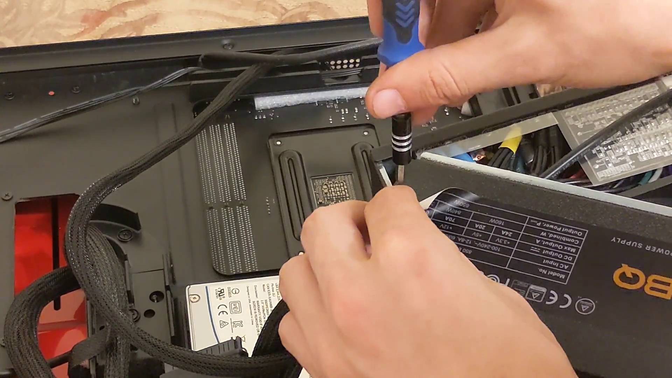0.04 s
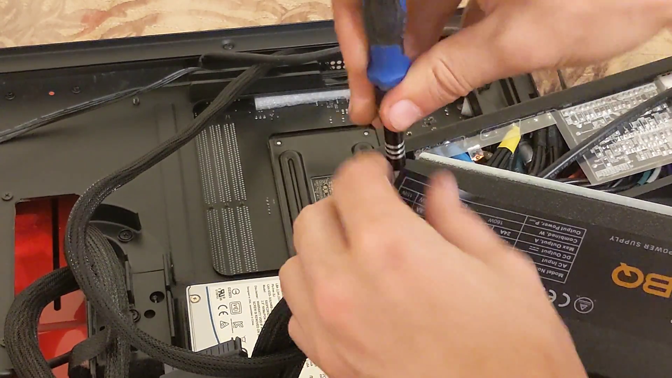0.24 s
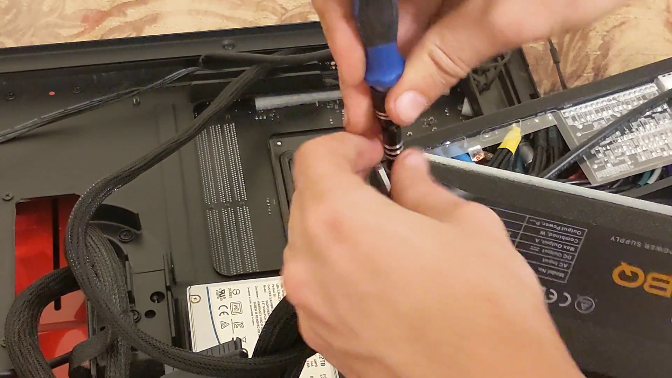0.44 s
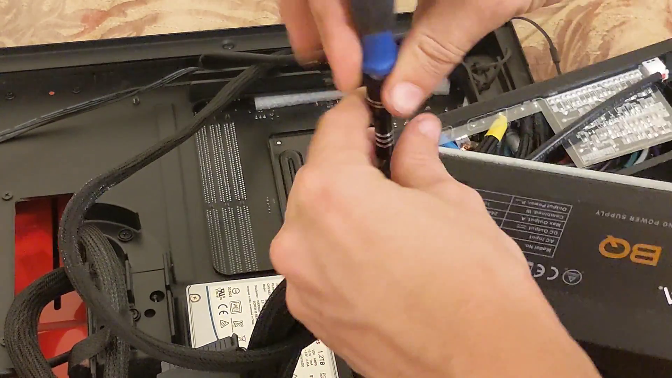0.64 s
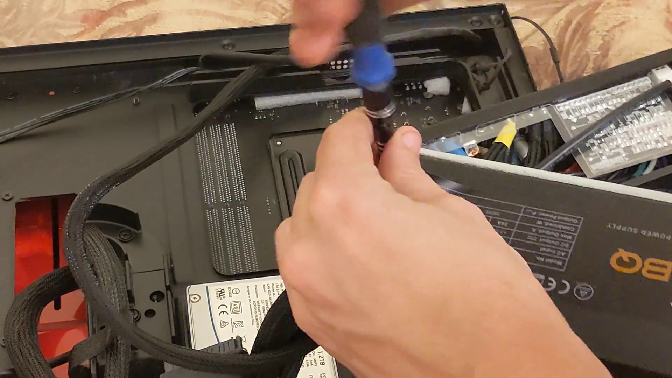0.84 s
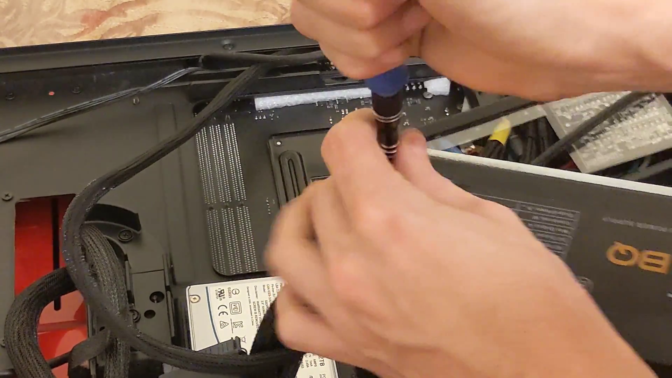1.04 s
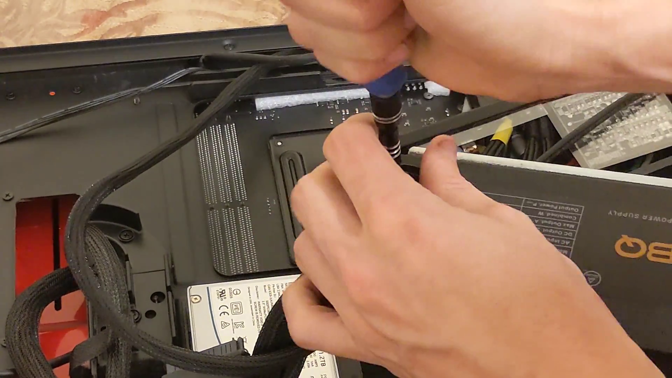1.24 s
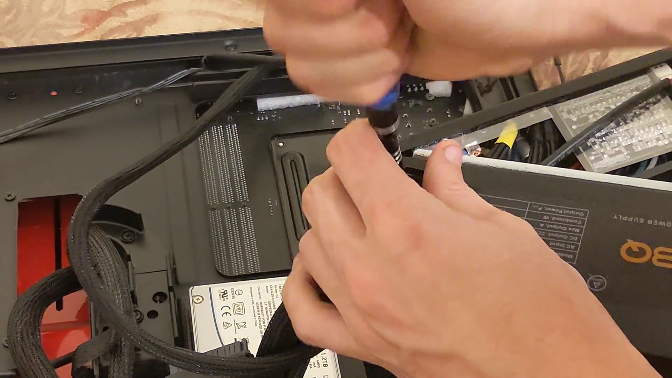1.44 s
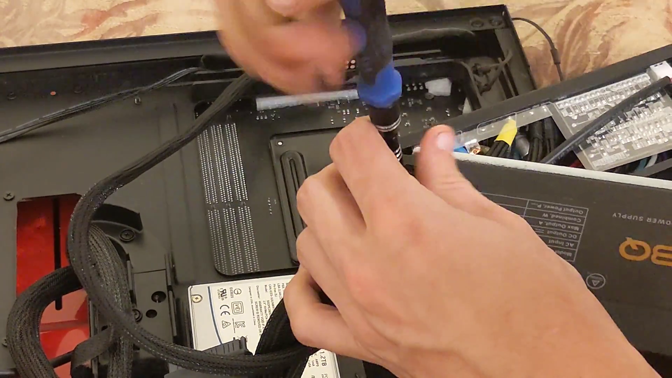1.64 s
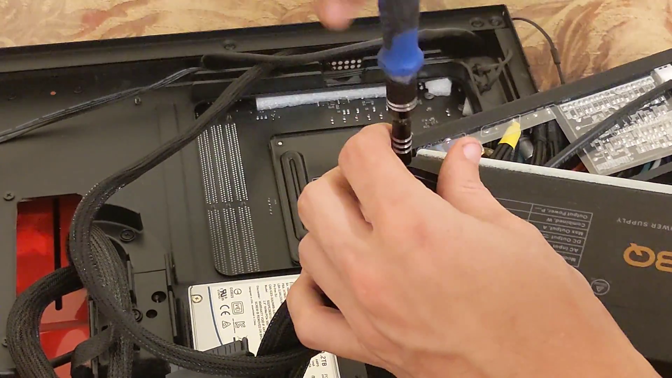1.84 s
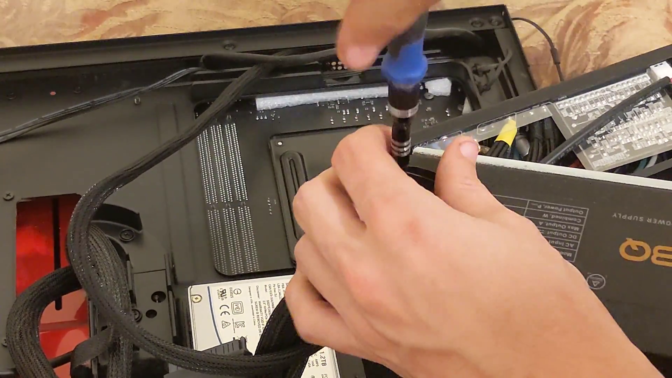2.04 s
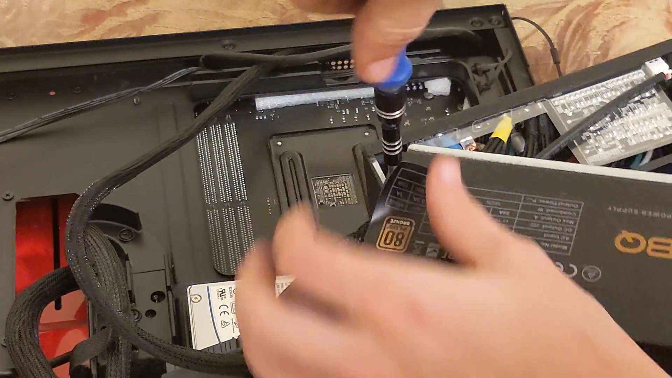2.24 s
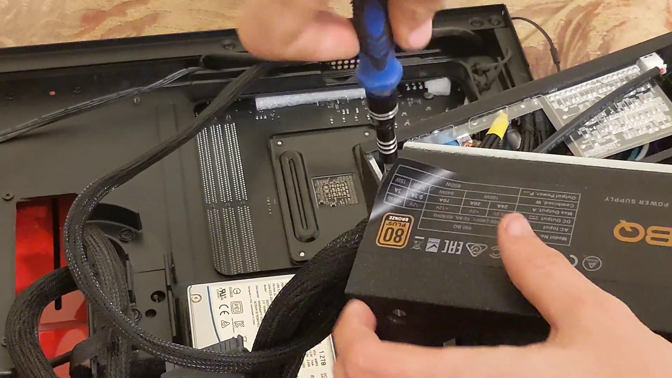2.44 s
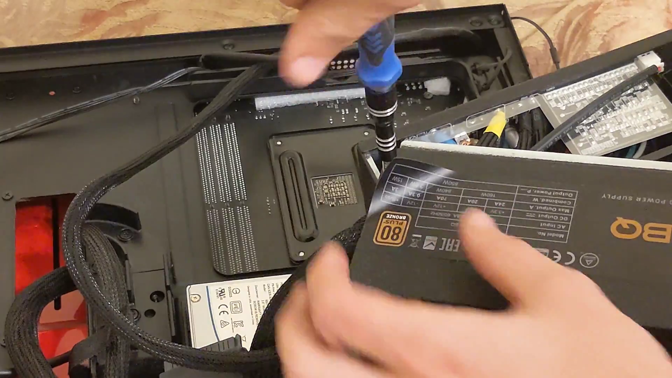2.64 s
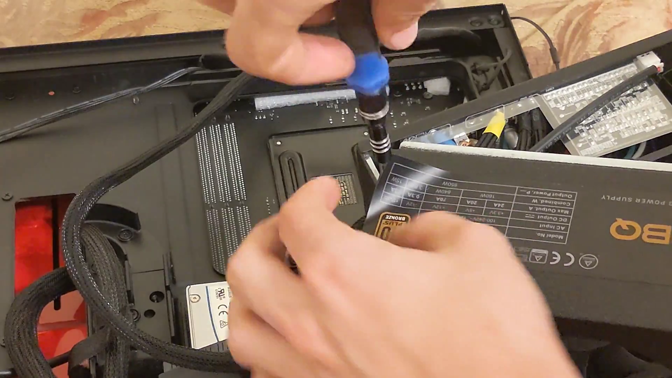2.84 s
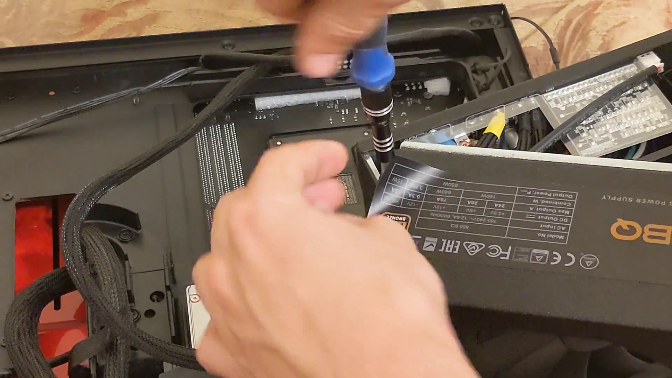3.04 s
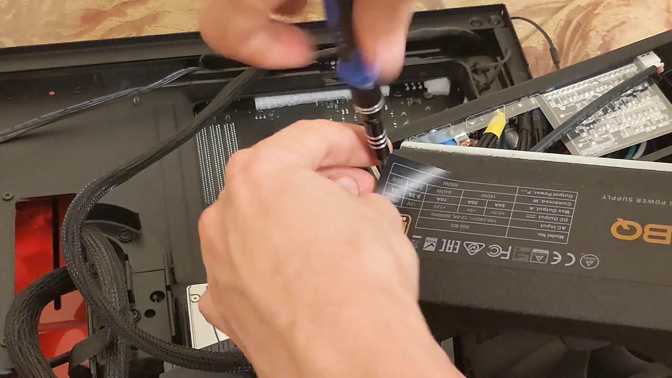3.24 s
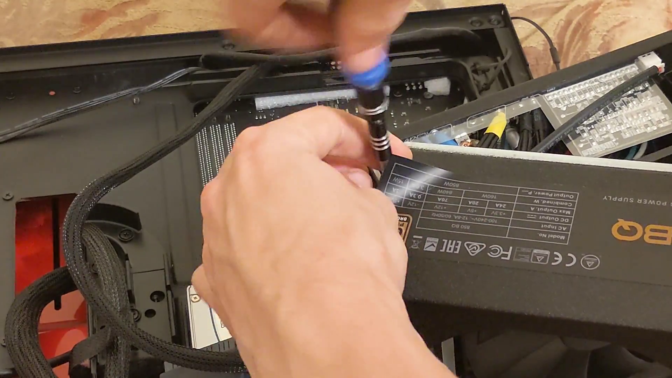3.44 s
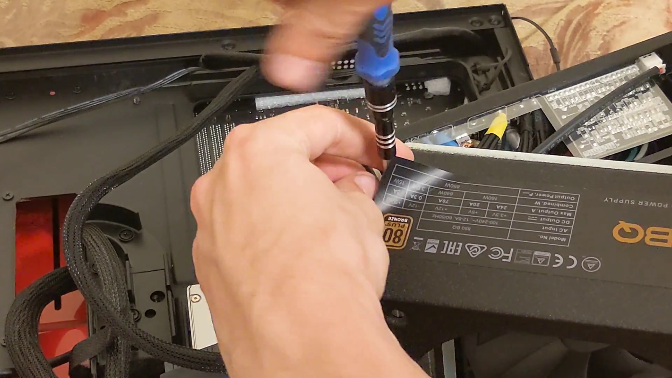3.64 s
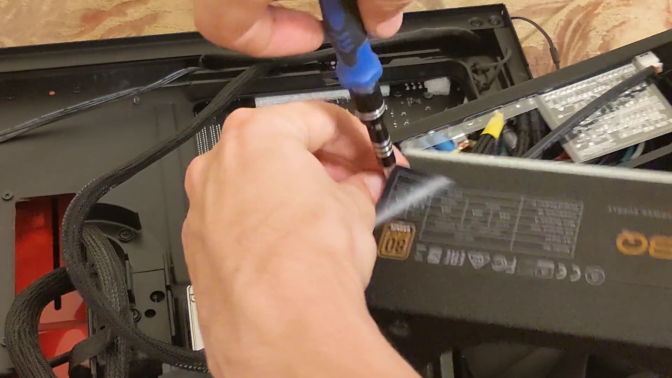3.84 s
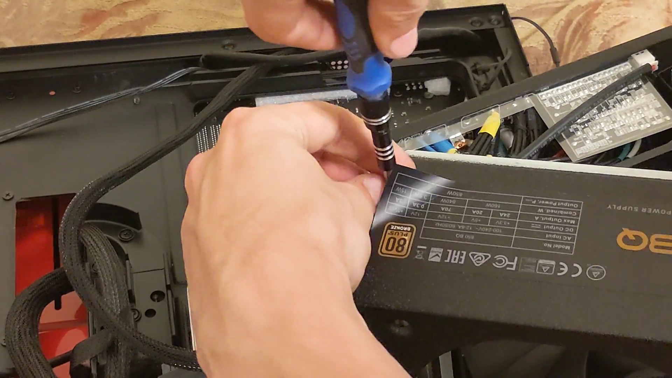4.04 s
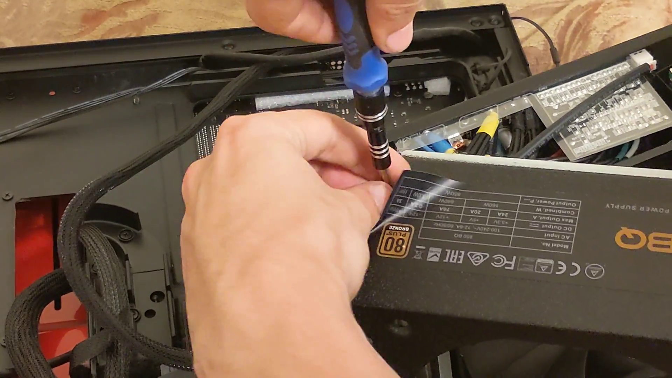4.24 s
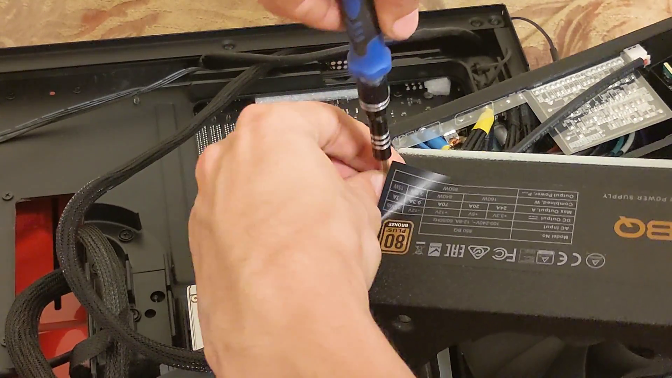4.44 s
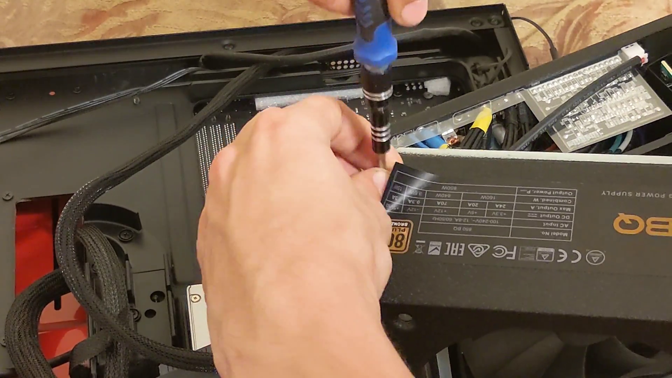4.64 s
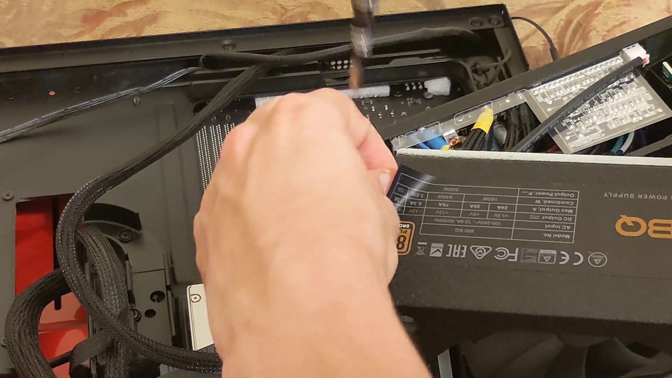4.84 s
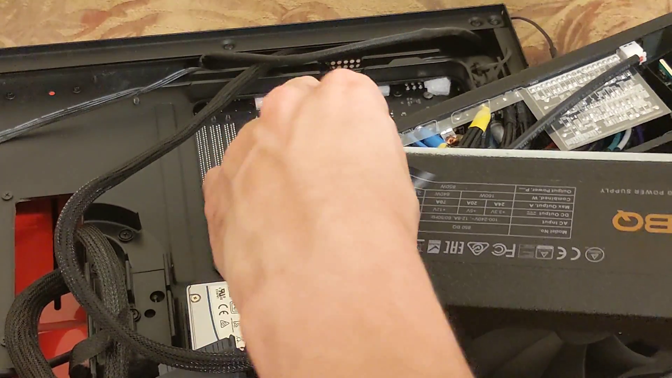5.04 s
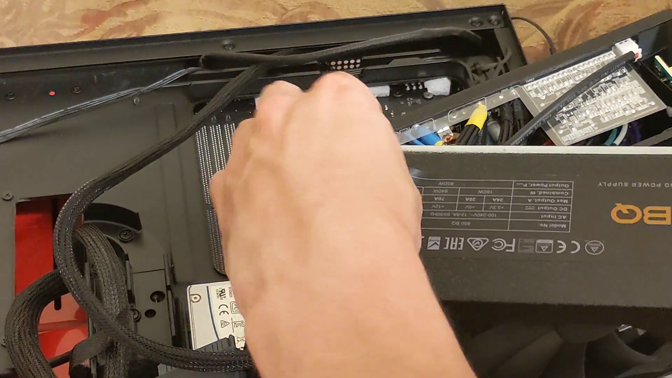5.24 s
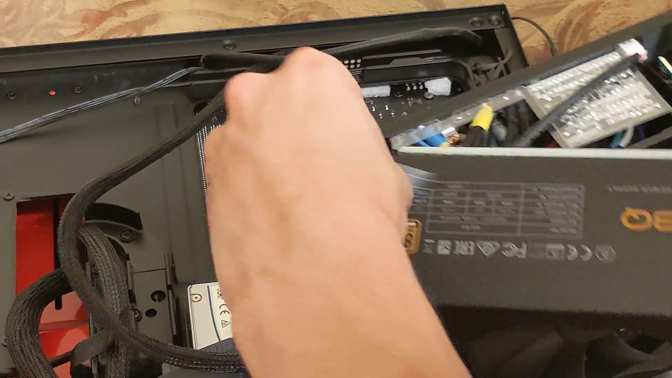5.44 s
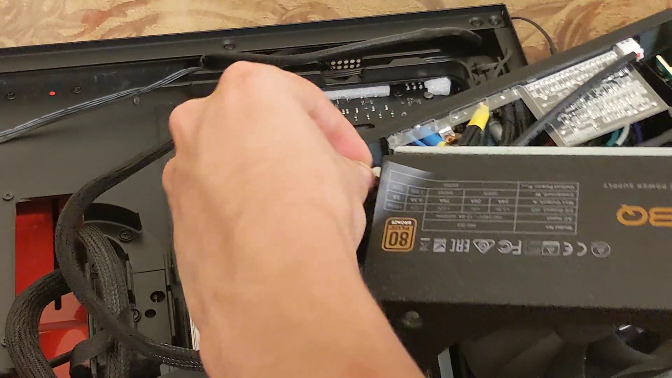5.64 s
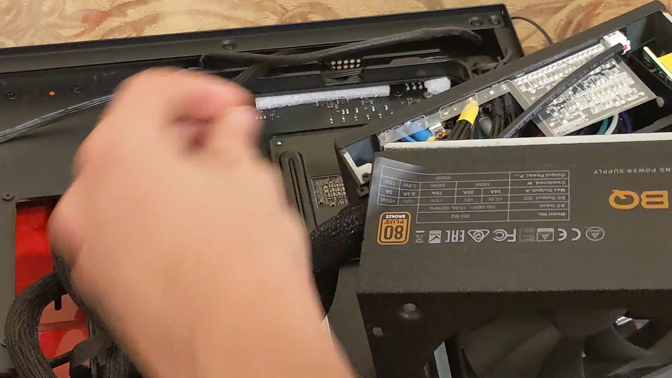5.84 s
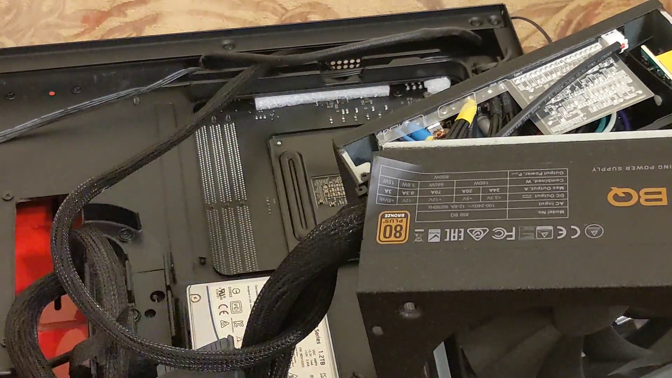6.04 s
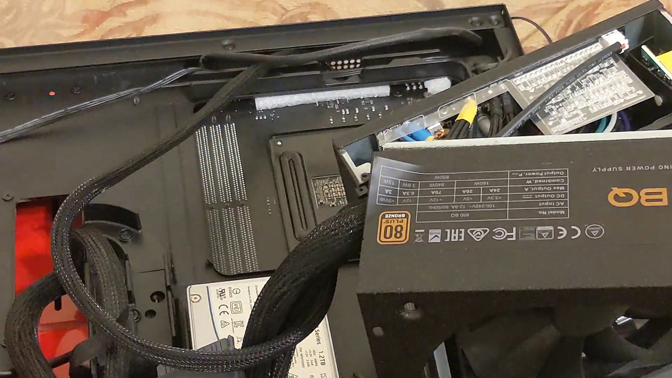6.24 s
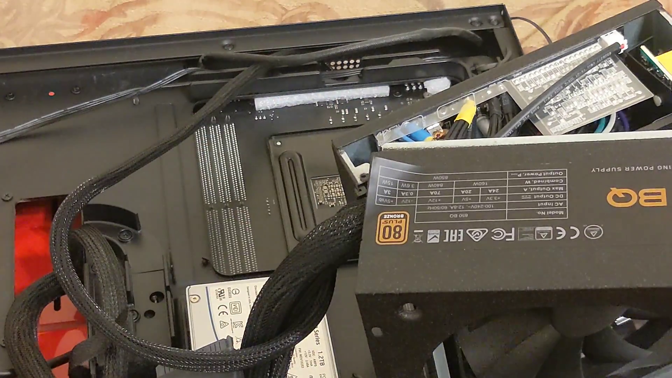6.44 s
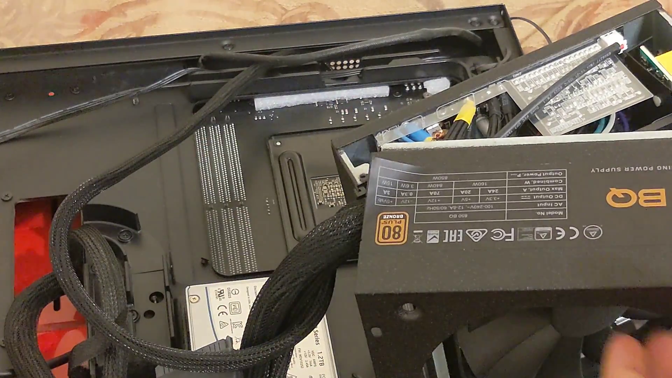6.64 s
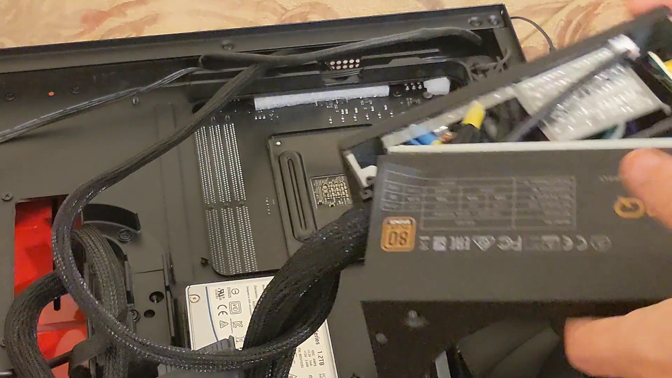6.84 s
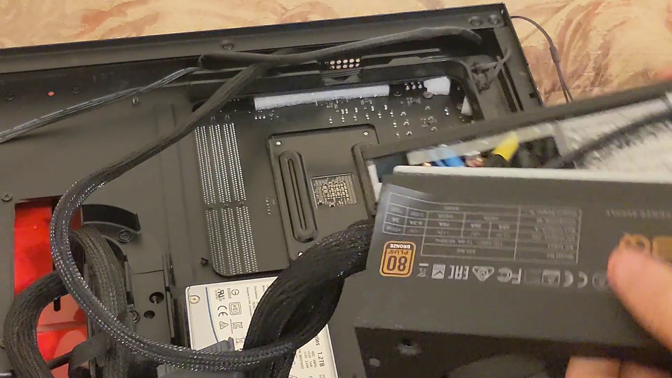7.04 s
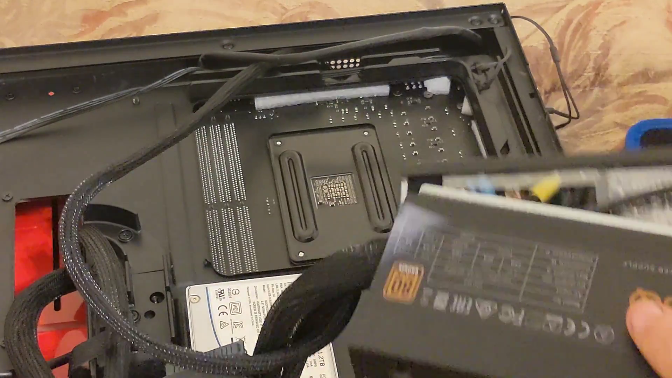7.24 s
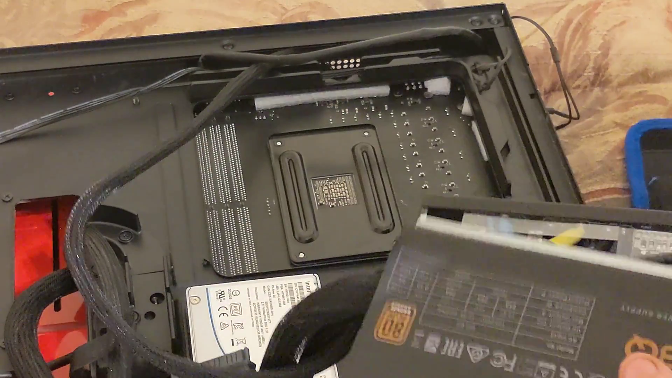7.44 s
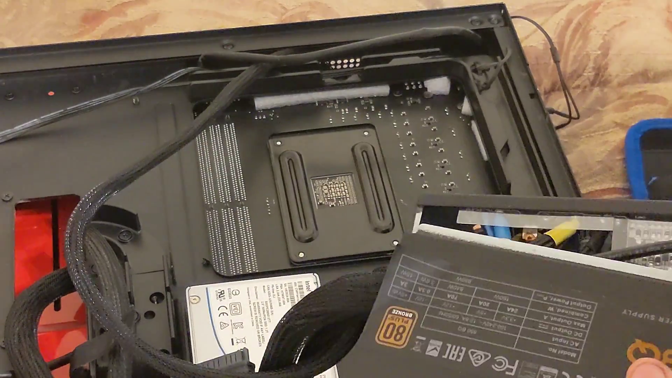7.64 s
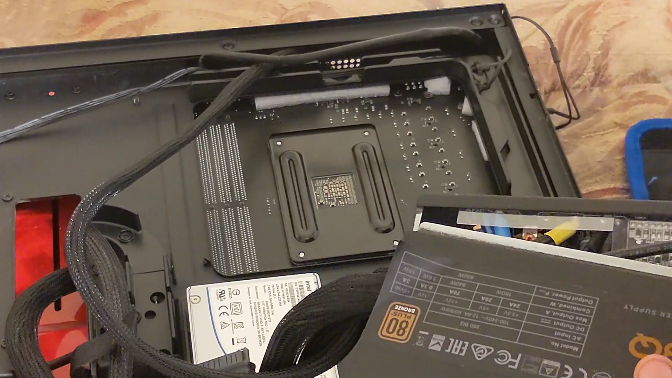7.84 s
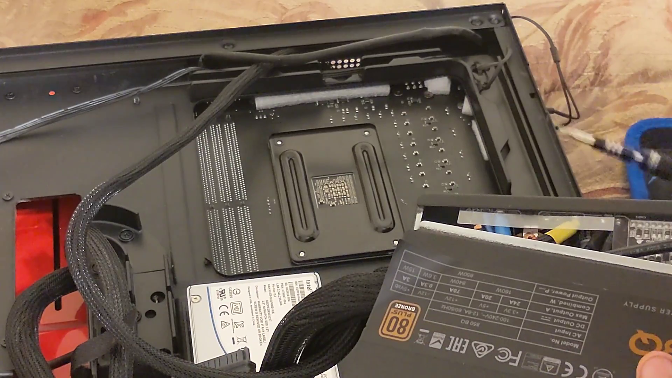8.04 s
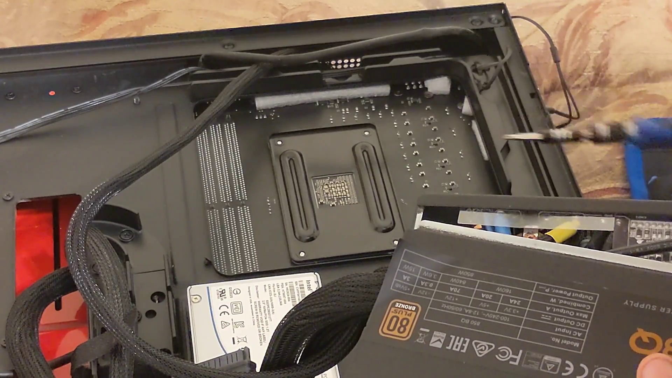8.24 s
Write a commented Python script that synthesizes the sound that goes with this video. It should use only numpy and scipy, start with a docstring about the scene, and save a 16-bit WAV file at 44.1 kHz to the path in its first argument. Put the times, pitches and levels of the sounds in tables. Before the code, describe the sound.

Light metallic ticks and dull sheet-metal taps as a small screw is backed out, then a metal box scrapes aside with loose rattling knocks.

```python
"""Screw backed out of a sheet-metal box

A small screw is backed out of a sheet-metal box that lies on an open computer case, in a quiet room.
Noise bursts for the blows drive dull panel filters and dying modes; the steel bit ticks and skids brightly.
Gritty noise makes the rub of fingers and cables; filtered noise creaks, and short sines pop.
At the end the box is dragged aside and set down, with a loose lid rattling and the bench thudding.
"""
import sys
import numpy as np
from scipy import signal
from scipy.fft import rfft, irfft
from scipy.io import wavfile
from scipy.ndimage import uniform_filter1d

SR = 44100
rng = np.random.default_rng(int(sys.argv[2]) if len(sys.argv) > 2 else 0)


def unload_wav(signal):
    """Save mono or channel-first audio to the path in sys.argv[1] as 16-bit WAV at rate SR, clipped to [-1, 1]."""
    wavfile.write(
        sys.argv[1],
        SR,
        np.round(np.clip(np.atleast_2d(signal).T, -1, 1) * 32767).astype(np.int16),
    )


N = 366206  # samples

# Room tone and hiss, relative spectrum: freq_hz, level_db (per Hz)
AIR = [(25, -15), (84, -9), (108, -2.5), (167, -5), (208, -8.5), (313, -13), (524, -16.5), (787, -22),
       (4360, -25.5), (10700, -34), (15200, -29), (16500, -44)]
AIR_DB = -66
# Likeness of left and right in room tone and echoes: freq_hz, likeness (0 to 1)
LIKENESS = [(25, 0.83), (110, 0.49), (250, 0.79), (1000, 0.19), (4000, 0.067), (8000, 0.77), (14000, 0.71)]
# Decay of the room echoes: freq_hz, t60_s
ROOM_DECAY = [(150, 0.52), (400, 0.3), (1000, 0.28), (3000, 0.33), (8000, 0.28), (15000, 0.16)]

# Short dry pops with no echo, close to the microphone: start_s, level_db, pitch_hz, pan_db (left over right)
POPS = [(2.023, -43.5, 780, -10), (5.05, -47, 1660, -2), (6.178, -51.5, 800, -9)]

# Short pitched creaks: start_s, length_s, level_db (before the fades), pitch_hz
CREAKS = [(0.083, 0.053, -46.5, 560), (1.459, 0.17, -71, 774), (1.49, 0.12, -72, 3340),
          (2.078, 0.043, -71, 3200), (2.287, 0.046, -68, 3120), (3.932, 0.069, -54.5, 910),
          (4.496, 0.086, -60, 692), (5.444, 0.035, -58.5, 1790), (5.671, 0.022, -47.5, 694),
          (7.017, 0.022, -32, 666), (7.037, 0.02, -39.5, 5900), (7.201, 0.029, -37, 2590),
          (7.329, 0.11, -40.5, 2610), (7.826, 0.092, -52.5, 700)]
CREAK_Q = 10.3  # sharpness of the creaking panel, in each of two passes

# Twists and shifts of the hands: peak_s, drag_db (on the box), rustle_db (skin and thread)
STROKES = [(0, -64, -58.5), (.98, -73, -65), (1.91, -69.5, -70), (2.22, -74.5, -76), (2.487, -67.5, -65),
           (2.919, -64, -67), (3.25, -72.5, -83), (3.588, -65, -70.5), (3.964, -51.5, -56.5),
           (5.43, -70, -64), (5.69, -55.5, -75), (5.77, -98, -63), (5.958, -66, -60), (6.306, -67.5, -76),
           (7.948, -52, -88), (8.1, -71, -86)]
SWELL_DB_PER_S, EASE_DB_PER_S = 174, 159  # a stroke builds up, then lets go
# Faint rub as long as the hands are on the work
GRIP_DRAG_DB, GRIP_RUSTLE_DB, LET_GO_S = -79, -81, 6.05
# The box is dragged aside: time_s, drag_db, rustle_db, shudder_db (of the bench)
HAUL = [(6.78, -95, -75, -100), (6.92, -69, -71, -76), (7.03, -40.5, -47.5, -44), (7.14, -48.5, -52, -51),
        (7.31, -47.5, -56.5, -51), (7.42, -39, -44, -50.5), (7.53, -52.5, -52.5, -54.5),
        (7.72, -61.5, -77.5, -63), (7.949, -80, -74, -58.5), (8.3, -81, -87.5, -69)]

# Steel bit and screw touching metal: start_s, sizzle_db, clink_db, pan_db (left over right)
TICKS = [(0.1062, -34, -26, 4), (0.239, -46, -45, 1), (0.3441, -46, -46, -2), (0.407, -53, -56, 6),
         (0.6464, -57, -44.5, 8), (0.844, -44, -47, 3), (0.974, -42, -35, 6), (1.747, -55, -64, 5),
         (1.8851, -46, -44.5, 8), (2.177, -46, -58, 3), (2.616, -42.5, -43, 3), (2.793, -48, -49.5, 2.0),
         (2.918, -37.5, -73, 5), (2.9874, -42, -62, 0), (3.1762, -46, -45, 0), (3.248, -44.5, -50, 1),
         (3.5019, -57, -58, 3.5), (3.588, -44, -66, 1), (3.642, -54, -48.5, 3), (3.951, -34, -56, 0),
         (4.0692, -40, -51, 5.5), (4.288, -60, -56.5, 8), (4.574, -42, -57, 0), (5.047, -55, -59, -3),
         (5.232, -60, -55, 0), (5.2759, -49, -54, 1), (5.6008, -53, -38, 6), (5.618, -40, -38, 3),
         (5.661, -45, -38.5, 7), (5.694, -31, -56, 2), (5.703, -45, -44, 0), (5.7663, -29, -53, -1),
         (5.8566, -9, -47, 3.5), (7.0362, -12.5, -18.5, 4), (7.337, -42, -29.5, 4), (7.372, -24.5, -35, 1),
         (7.434, -29, -21.5, -1.5), (7.5586, -48, -16.5, 12), (7.926, -28.5, -30, 4), (8.104, -50, -57, 7)]
# The bit skids in the screw head: start_s, sizzle_db, clink_db, contact_ms (decay time)
SKIDS = [(1.1888, -50, -40, 7.2), (3.968, -37, -41, 4.4), (4.004, -27.5, -42, 7.2),
         (4.9085, -33.5, -75, 2.7), (5.4077, -40, -45, 11), (5.7454, -34.5, -51, 4.5),
         (5.972, -38, -49, 4.1)]
# Small steel parts, relative spectrum: freq_hz, level_db (per Hz)
STEEL = [(3500, 9.5), (5300, -4.5), (6900, 2), (9500, 0), (11600, 0.5), (13500, 7.5), (15400, 9),
         (16500, -12.5)]
# A tick with -44 dB of sizzle lasts TICK_MS; harder ticks are shorter
TICK_MS, SNAP_DB_PER_DB = 2.02, 0.3

# Blows on the box: start_s, clank_db, boom_db, pitch_hz (struck panel), contact_ms (decay time, 20 at most)
KNOCKS = [(0.0099, -34, -61, 1370, 6.1), (0.0839, -36, -47.5, 1510, 7.2), (0.1068, -23, -52, 1710, 5.2),
          (0.2382, -30.5, -47, 1710, 5), (0.35, -37.5, -49, 1470, 8.2), (0.6402, -44.5, -56.5, 2350, 9.9),
          (0.7158, -44, -52.5, 1720, 6.4), (0.8435, -41, -48.5, 1420, 5.1), (0.9337, -42, -47.5, 1600, 21),
          (0.9754, -30.5, -45.5, 1490, 2.7), (1.187, -31.5, -41, 3470, 15.7), (1.228, -36.5, -39, 2160, 13),
          (1.8805, -49.5, -52.5, 1790, 9.2), (1.939, -37, -65, 1920, 3.7), (2.206, -47, -62, 1600, 3.9),
          (2.4654, -37, -44, 1400, 3.9), (2.563, -43.5, -60, 2580, 5.2), (2.614, -42, -44.5, 1780, 4.1),
          (2.866, -47.5, -59, 1800, 6.4), (2.9175, -38.5, -61, 1660, 2.7), (3.178, -41.5, -52, 3120, 2.2),
          (3.889, -49, -62, 1750, 6.8), (3.9433, -39.5, -67, 1760, 2.8), (3.9799, -35.5, -41, 1550, 8.9),
          (3.991, -31, -45, 1500, 3.5), (4.0033, -28.5, -38, 3560, 10.9), (4.086, -60, -43, 1400, 2.8),
          (4.5136, -56, -48, 1350, 6.5), (4.576, -41.5, -56, 3550, 4.9), (5.274, -40, -80, 3470, 4.3),
          (5.411, -44, -82, 3400, 9.3), (5.5544, -43, -50.5, 1860, 7.4), (5.564, -50, -55, 1900, 2.6),
          (5.593, -35.5, -49, 1300, 9.8), (5.673, -38, -40.5, 1430, 6.2), (5.8205, -42, -55.5, 2030, 9.6),
          (5.8562, -32, -49, 2040, 3.7), (6.822, -42, -72, 4400, 11), (6.9536, -40.5, -69, 1320, 8.8),
          (6.9685, -37, -64, 1390, 10), (7.0219, -41, -37, 1330, 6.6), (7.079, -21.5, -39, 1330, 4.2),
          (7.203, -28.5, -31, 1440, 10.2), (7.2591, -28, -32.5, 2580, 4.6), (7.3342, -29, -33, 2000, 6.7),
          (7.3661, -22.5, -36, 1420, 6.5), (7.433, -22.5, -32, 1730, 6.4), (7.4918, -45, -26.5, 1610, 5.5),
          (7.5564, -12.5, -25.5, 2130, 1.89), (7.9214, -21, -42, 2020, 4.04),
          (8.1045, -37.5, -43.5, 1900, 6.1)]
# Dense dull sound of the box panels, relative spectrum: freq_hz, level_db (per Hz)
BOX = [(120, -46), (200, 3.5), (285, -8.5), (710, 2.5), (1150, 3.5), (1390, 4), (2010, -1), (3440, -3.5),
       (3920, -7.5), (6000, -6.5), (7800, -96)]
# Modes of the case tray: freq_hz, level_db (relative), t60_s
CASE = [(551.4, 9.5, 0.19), (779.6, 13, 0.15), (1032, 0, 0.22), (1433, 7.5, 0.11), (1538, 10.5, 0.06),
        (1792, 2.5, 0.062), (2077, 3.5, 0.085), (3274, -1.5, 0.11)]
# Modes of the loose lid: freq_hz, level_db (relative), t60_s (0.03 at least)
LID = [(670, 6, 0.024), (855, 14, 0.035), (1450, 12, 0.023), (2040, 8.5, 0.027), (2710, -9, 0.12),
       (3480, -3, 0.056)]
# Air and walls of the box: freq_hz, level_db (relative), t60_s
HOLLOW = [(323.6, 0, 0.15), (450, -1, 0.079)]
# Shares of a boom: into the hollow box, the bench, the tray; the tray gets more while the driver is seated
HOLLOW_DB, THUD_DB, TRAY_DB, SEATING_DB, SEATED_S = -6.5, -8, -4.5, 9, 0.6
LID_DB, LID_SHIFT = -5, .025  # share of a clank; typical relative shift of the lid modes from blow to blow
# The softer a blow under HARD_DB, the more the struck panel stands out
DULL_DB_PER_DB, HARD_DB = 0.68, -25
# While tray or lid ring along, the clank goes into their modes and less of it stays broad
RING_DB, BARE_DB = -2, -4.5

PORTS_HZ = 350  # below this the two microphone ports hear nearly the same
EDGE_HZ = 16000  # upper band limit


def gain_of(db):
    """Amplitude factor for a level in dB."""
    return 10 ** (np.asarray(db) / 20)


def evened(x):
    """Scales a signal to an RMS of 1."""
    return x / np.sqrt(np.mean(x ** 2) + 1e-20)


def read(points, hz):
    """Reads a curve at any frequency, straight between points on a log axis."""
    f, value = np.transpose(points)
    return np.interp(np.log(hz + 1), np.log(f + 1), value)


def paired(z, same):
    """The second microphone hears a share of the first one's noise, filled up with noise of its own."""
    same = np.clip(same, 0, 1)
    return np.array([z[0], same * z[0] + np.sqrt(1 - same ** 2) * z[1]])


def panned(level_db, pan_db):
    """Left and right gains; positive pan is louder on the left."""
    return gain_of(level_db + np.array([[pan_db / 2], [-pan_db / 2]]))


def add(mix, s, sound):
    """Mixes a sound in at a time in seconds."""
    part = mix[:, round(s * SR):][:, :sound.shape[1]]
    part += sound[:, :part.shape[1]]


def train(s, level_db, force, pan_db):
    """Puts the bursts in place, louder on the nearer side."""
    out = np.zeros((2, N))
    for at, db, burst, pan in zip(s, level_db, force, pan_db + 0 * s):
        add(out, at, panned(db, pan) * burst)
    return out


def through(x, h):
    """Sends both channels through one response."""
    return signal.oaconvolve(x, h[None])[:, :N]


def causal(points, lo_hz, hi_hz, size=1024):
    """Minimum-phase response with this spectrum between two soft edges, energy 1."""
    hz = abs(np.fft.fftfreq(8 * size, 1 / SR)) + 1
    edges = 1 / np.sqrt((1 + (lo_hz / hz) ** 6) * (1 + (hz / hi_hz) ** 6))
    log_gain = np.log(gain_of(read(points, hz)) * edges + 1e-5)
    h = np.fft.ifft(np.exp(np.conj(signal.hilbert(log_gain)))).real[:size]
    return h / np.linalg.norm(h)


def ringing(modes):
    """Sum of dying sines, energy 1."""
    t = np.arange(SR // 3) / SR
    ring = 0
    for hz, db, t60 in modes:
        decay = gain_of(db - 60 * t / np.clip(t60, .03, .6))
        ring = ring + decay * np.sin(2 * np.pi * hz * t)
    ring = signal.lfilter(*signal.butter(2, 300, "high", fs=SR), ring)  # the ringing carries no deep bass
    return ring / np.linalg.norm(ring)


def contacts(ms, rise, chatter_db, same):
    """Bursts of force that swell, chatter and die; whitened, so that no burst has a pitch."""
    u = np.arange(2048) / SR / (np.clip(ms, .2, 20)[:, None] / 1000)  # time in contact lengths
    draws = np.moveaxis(rng.standard_normal((len(ms), 3, 2048)), 1, 0)
    chatter = gain_of(chatter_db * evened(uniform_filter1d(draws[2], size=30)))
    shape = (1 - np.exp(-u / np.clip(rise, .01, 2))) * np.exp(-u) * chatter
    force = draws[:2]
    for _ in range(2):
        # flatten the spectrum, then the envelope
        z = rfft(force * shape)
        force = irfft(z / (abs(z) + 1e-12))
        force = force / np.sqrt(uniform_filter1d(force ** 2, size=64) + 1e-14)
    force = force * shape
    smooth_size = np.linalg.norm(shape / chatter, axis=-1, keepdims=True)
    force *= smooth_size / np.linalg.norm(force, axis=-1, keepdims=True)
    return np.moveaxis(paired(force, same), 1, 0)


def grit(level, per_s, spread_db, same):
    """Stick and slip: random tiny catches of uneven size, coming in clumps."""
    catches = rng.standard_normal((2, N)) * (rng.random(N) < per_s / SR)
    catches *= gain_of(spread_db * np.minimum(rng.exponential(1, N), 3))
    catches *= gain_of(4 * evened(uniform_filter1d(rng.standard_normal(N), size=700)))
    return level * evened(paired(catches, same))


def hauled(column):
    """One column of the haul as gain over time."""
    rows = np.transpose(HAUL)
    return gain_of(np.interp(np.arange(N) / SR, rows[0], rows[column], left=-120))


def rubbing(column, grip_db):
    """Gain of the sliding contact: resting grip, strokes that swell and ease, and the haul."""
    t = np.arange(N) / SR
    level = gain_of(grip_db) * (t < LET_GO_S) + hauled(column)
    for row in STROKES:
        late = t - row[0]
        level = level + gain_of(row[column] + np.minimum(SWELL_DB_PER_S * late, -EASE_DB_PER_S * late))
    return level


def room_tone():
    """Steady air noise from random short-time spectra with faint drifting patches."""
    frames, hz = N // 256 + 5, np.fft.rfftfreq(1024, 1 / SR)
    a, b, c, d, patches = rng.standard_normal((frames, 513, 5)).T
    patches = uniform_filter1d(patches, 10, axis=0)
    patches = evened(uniform_filter1d(patches, 14, axis=1))
    z = paired(np.array([a + 1j * b, c + 1j * d]), read(LIKENESS, hz)[:, None])
    z *= gain_of(read(AIR, hz)[:, None] + 1.5 * patches)
    return gain_of(AIR_DB) * evened(signal.istft(z, nperseg=1024, noverlap=768)[1][:, :N])


def echoes(x):
    """Sparse taps of random sign, each band dying at its own speed."""
    taps = np.zeros((2, SR // 2))
    at = np.arange(120, SR // 2 - 20, 20) + rng.integers(0, 20, (2, (SR // 2 - 121) // 20))
    np.put_along_axis(taps, at, rng.choice([-1., 1.], at.shape), 1)
    hz, t, z = signal.stft(taps, SR, nperseg=512)
    z = paired(z, read(LIKENESS, hz)[:, None])
    fade = gain_of(-60 * t / read(ROOM_DECAY, hz)[:, None])
    tail = signal.istft(z * fade, SR, nperseg=512)[1]
    return signal.fftconvolve(x, tail / np.linalg.norm(tail[0]), axes=1)[:, :N]


def room(x):
    """Three tails take turns, since hands and box keep moving and no two blows echo quite alike."""
    turn = 2 * np.pi * 1.7 * np.arange(N) / SR
    return sum(echoes(np.sqrt(2 / 3) * np.cos(turn + k * np.pi / 3) * x) for k in range(3))


def pops():
    """A couple of sine cycles that die at once."""
    out, t = np.zeros((2, N)), np.arange(600) / SR
    for s, db, hz, pan_db in POPS:
        pop = np.sin(2 * np.pi * hz * t) * np.exp(-.45 * hz * t)
        add(out, s, panned(db, pan_db) * pop)
    return out


def bench():
    """Low thuds under the blows and shudder of the bench top, through a low resonant band."""
    s, _, boom_db, _, ms = np.transpose(KNOCKS)
    force = contacts(ms, rise=0.76, chatter_db=7.0, same=1.0)
    thuds = train(s, boom_db + THUD_DB, force, pan_db=2.0)
    shudder = grit(hauled(column=3), per_s=1400, spread_db=2.5, same=1.0)
    top = [(20, -17.0), (60, -11.5), (130, 5.0), (200, 7.0), (320, -4.5)]  # freq_hz, level_db (relative)
    return through(shudder + thuds, causal(top, 75, 413, size=4096))


def creaks():
    """Quick slips under load keep one panel of the box sounding."""
    out = np.zeros((2, N))
    for s, length, db, hz in CREAKS:
        u = np.arange(0, length, 1 / SR) / length
        uneven_grip = gain_of(5 * evened(uniform_filter1d(rng.standard_normal(len(u)), size=200)))
        slips = uneven_grip * paired(rng.standard_normal((2, len(u))), same=1.0)
        for _ in range(2):
            slips = signal.lfilter(*signal.iirpeak(hz, CREAK_Q, SR), slips)
        fades = np.minimum(18.0 * u, 1) * np.sqrt(1 - u)
        add(out, s, gain_of(db) * fades * evened(slips))
    return out


def steel():
    """Ticks, skids and rustle sound through small steel parts, with hardly any ring."""
    s, sizzle_db, clink_db, pan_db = np.transpose(TICKS)
    tick_ms = TICK_MS * gain_of(-SNAP_DB_PER_DB * (sizzle_db + 44.0))
    ticks = contacts(tick_ms, rise=0.34, chatter_db=2.0, same=0.68)
    skid_s, skid_sizzle_db, skid_clink_db, ms = np.transpose(SKIDS)
    skids = contacts(ms, rise=1.07 / ms[:, None], chatter_db=3.5, same=0.65)
    rustle = grit(rubbing(2, GRIP_RUSTLE_DB), per_s=5000, spread_db=2.5, same=1.0)
    sizzle = train(s, sizzle_db, ticks, pan_db) + train(skid_s, skid_sizzle_db, skids, pan_db=3.0) + rustle
    clink = train(s, clink_db, ticks, 0.13 * pan_db) + train(skid_s, skid_clink_db, skids, pan_db=0.5)
    clink = clink + gain_of(-5.0) * rustle
    return through(sizzle, causal(STEEL, 7450, 27000)) + through(clink, causal(STEEL, 5430, 8360))


def case_tray(s, clank_db, boom_db, force, heavy, drag):
    """Booms, early clanks and drag go on into the case tray, which rings in its modes."""
    t = np.arange(N) / SR
    drive = train(s, boom_db + TRAY_DB + SEATING_DB * (s < SEATED_S), heavy, pan_db=-8.0)
    drive = drive + gain_of(-6) * (t < LET_GO_S) * drag  # the turning screw is felt in the tray
    drive = drive + gain_of(RING_DB) * (t < SEATED_S) * train(s, clank_db - 14.5, force, pan_db=9.0)
    return through(drive, ringing(CASE))


def loose_lid(s, clank_db, struck):
    """Once the box is moved the lid rattles, lying differently at each blow: its modes shift and change rank."""
    rattles = []
    for force, (shift, rank) in zip(struck, rng.standard_normal((len(s), 2, len(LID)))):
        modes = [(hz * (1 + LID_SHIFT * a), db + 1.8 * b, t60)
                 for (hz, db, t60), a, b in zip(LID, shift, rank)]
        rattles.append(signal.oaconvolve(force, ringing(modes)[None, :4096]))
    return train(s, np.where(s > 6.9, clank_db + LID_DB, -200), rattles, pan_db=0)


def box():
    """Knocks and drag shake the panels, the air inside, the loose lid and the case tray."""
    s, clank_db, boom_db, panel_hz, ms = np.transpose(KNOCKS)
    force = contacts(ms, rise=1.36 / ms[:, None], chatter_db=5.5, same=0.73)
    heavy = 0.45 * force + 0.54 * force[:, ::-1]  # long waves reach both microphones nearly alike
    struck = []
    for burst, hz, db in zip(force, panel_hz, clank_db):
        broad = gain_of(DULL_DB_PER_DB * (db - HARD_DB)) * burst
        panel = signal.lfilter(*signal.iirpeak(hz, 7., SR), burst)
        struck.append(broad + gain_of(-1.5) * panel)
    drag = grit(rubbing(1, GRIP_DRAG_DB), per_s=1200, spread_db=4.0, same=0.5)

    t = np.arange(N) / SR
    seating = t < SEATED_S
    bare = np.where(seating | (t > LET_GO_S), gain_of(BARE_DB), 1)
    clank = bare * train(s, clank_db, struck, pan_db=0.2) + drag
    boom = train(s, boom_db, heavy, pan_db=-4.0) + gain_of(-0.2) * drag.mean(0)
    hollow = train(s, boom_db + HOLLOW_DB, heavy, pan_db=1.0) * ~seating
    panels = through(clank, causal(BOX, 1360, 5200)) + through(boom, causal(BOX, 253, 713))
    tray = case_tray(s, clank_db, boom_db, force, heavy, drag)
    return loose_lid(s, clank_db, struck) + through(hollow, ringing(HOLLOW)) + panels + tray


def scene():
    """Mixes all layers; the pops stay out of the room echo."""
    low, high = box() + bench() + creaks(), steel()
    echo = room(gain_of(-1.0) * low + gain_of(2.5) * high)
    return low + high + pops() + echo + room_tone()


def record(dry):
    """Two close ports agree in the bass; the small microphone loses the deepest bass; then the band limit."""
    mid, side = dry.mean(0), (dry[0] - dry[1]) / 2
    side = signal.sosfilt(signal.butter(1, PORTS_HZ, "high", fs=SR, output="sos"), side)
    thin = signal.sosfilt(signal.butter(2, 36, "high", fs=SR, output="sos"), [mid + side, mid - side])
    band_limit = signal.firwin(601, EDGE_HZ, window=("kaiser", 9), fs=SR)
    return signal.oaconvolve(thin, band_limit[None], "same")


dry = scene()
out = record(dry)
unload_wav(out)
```